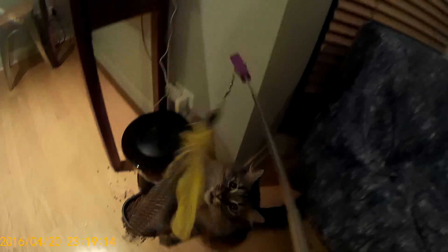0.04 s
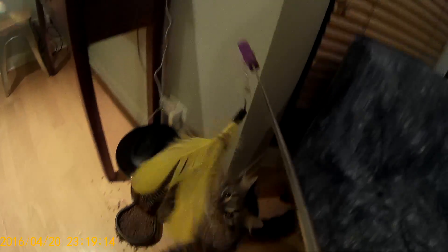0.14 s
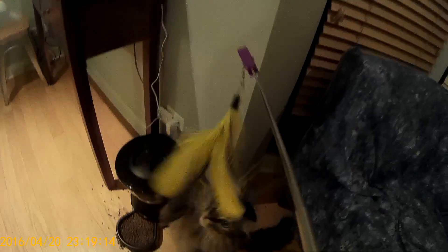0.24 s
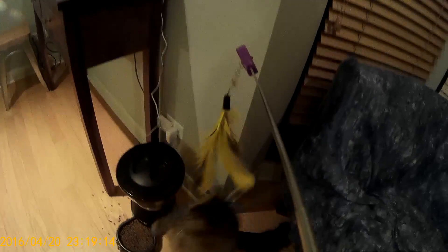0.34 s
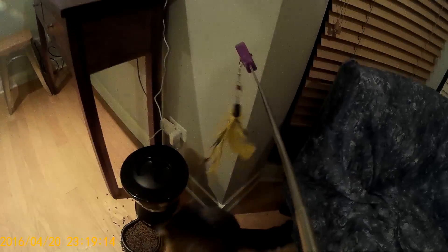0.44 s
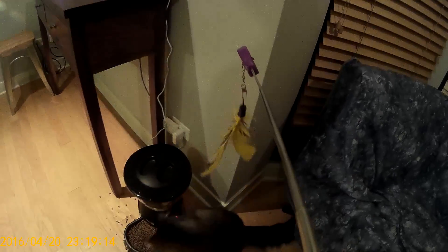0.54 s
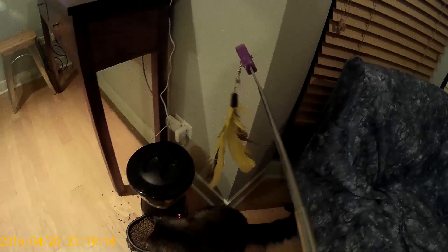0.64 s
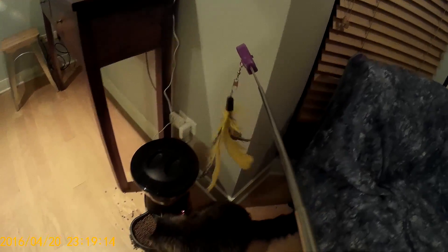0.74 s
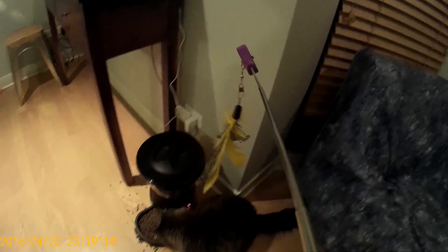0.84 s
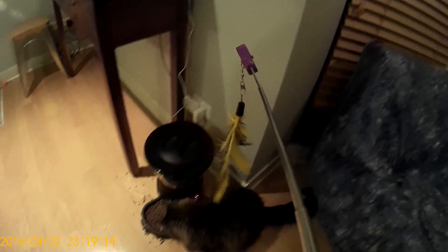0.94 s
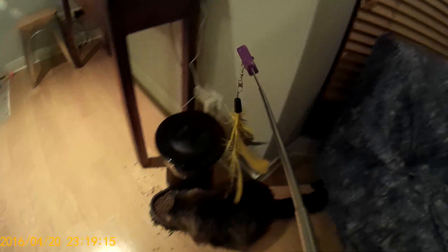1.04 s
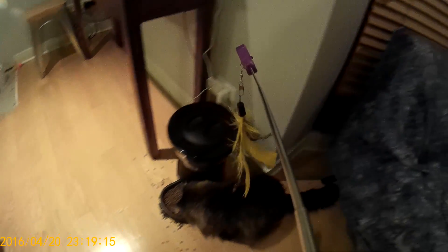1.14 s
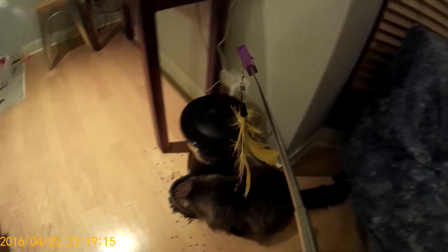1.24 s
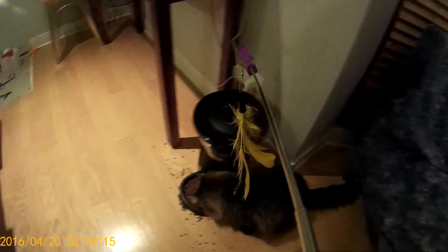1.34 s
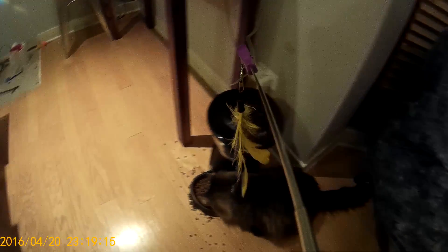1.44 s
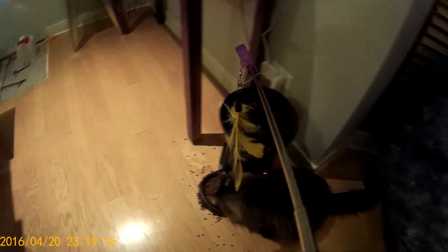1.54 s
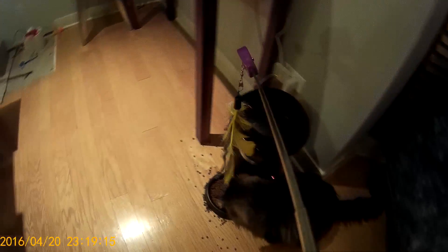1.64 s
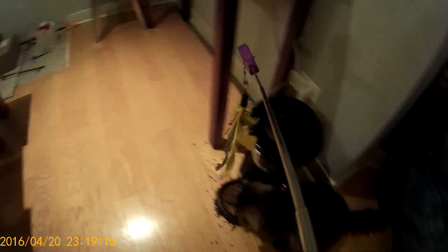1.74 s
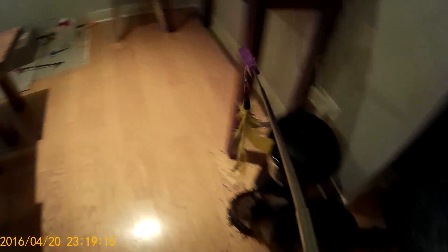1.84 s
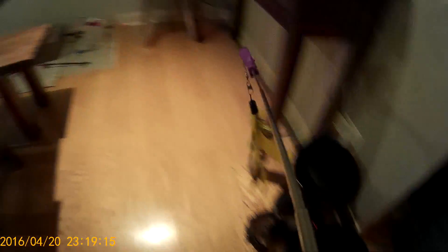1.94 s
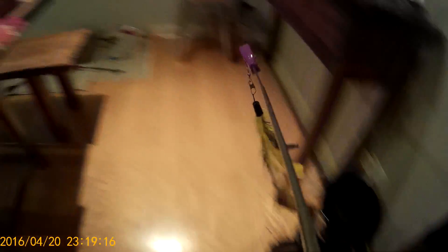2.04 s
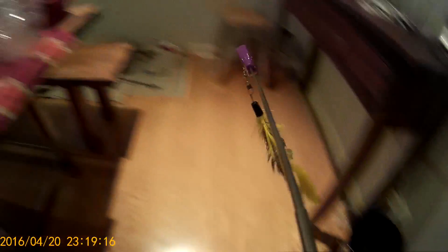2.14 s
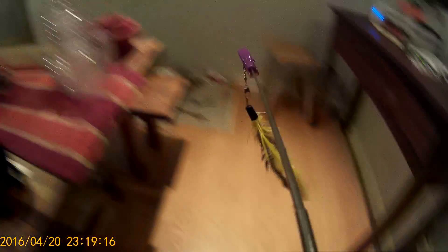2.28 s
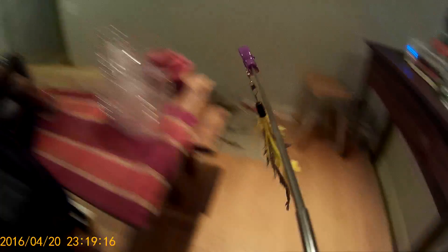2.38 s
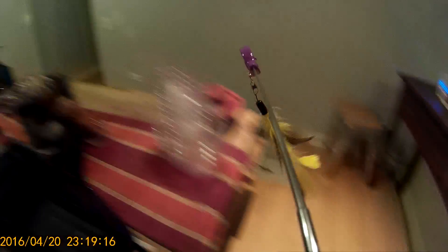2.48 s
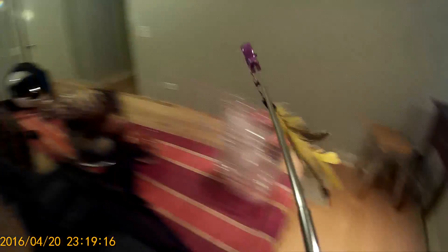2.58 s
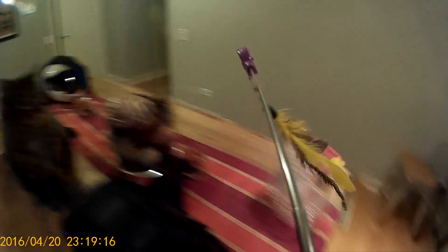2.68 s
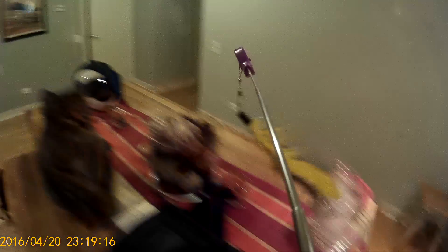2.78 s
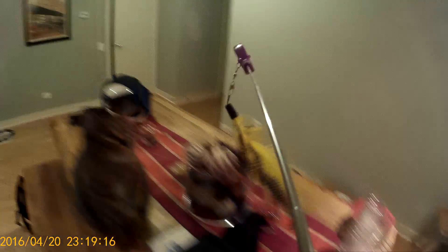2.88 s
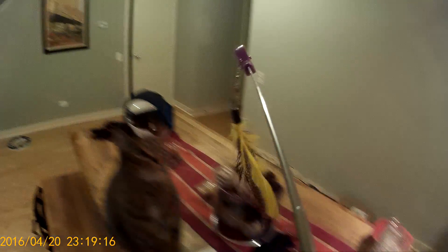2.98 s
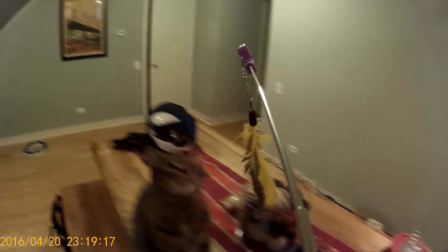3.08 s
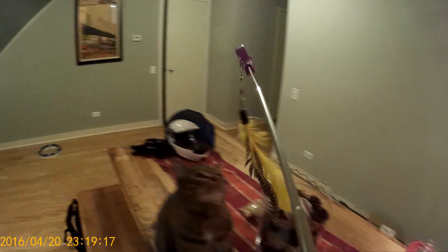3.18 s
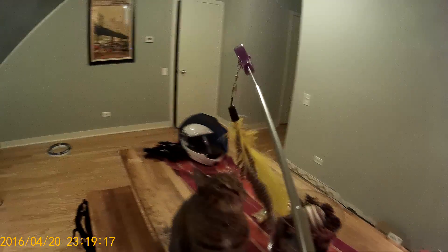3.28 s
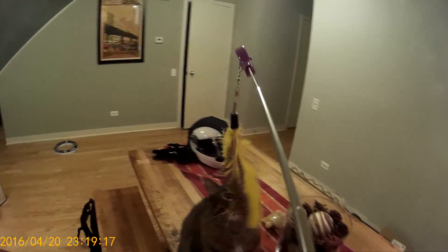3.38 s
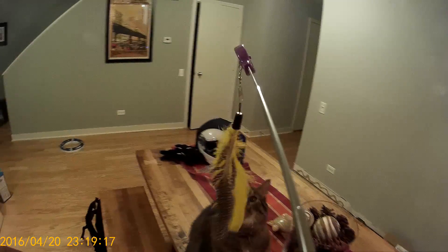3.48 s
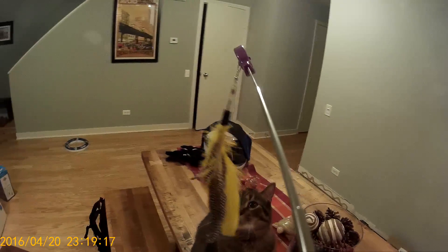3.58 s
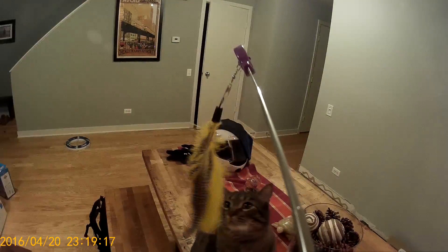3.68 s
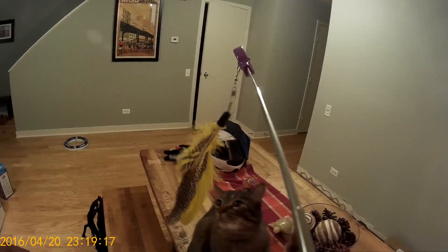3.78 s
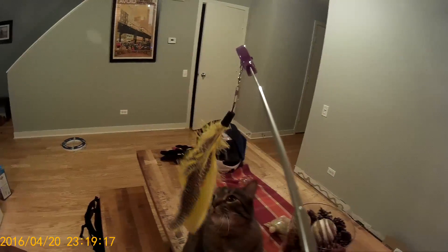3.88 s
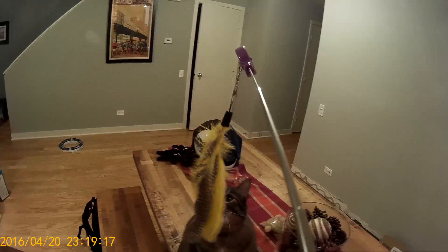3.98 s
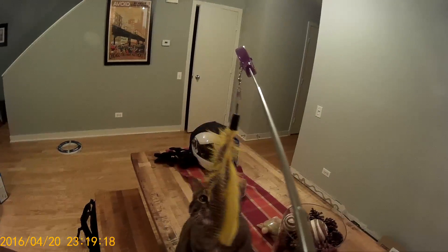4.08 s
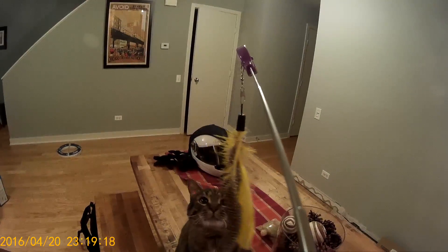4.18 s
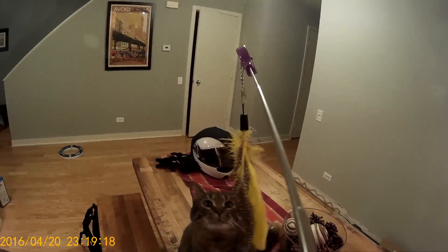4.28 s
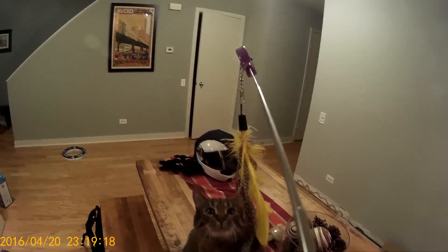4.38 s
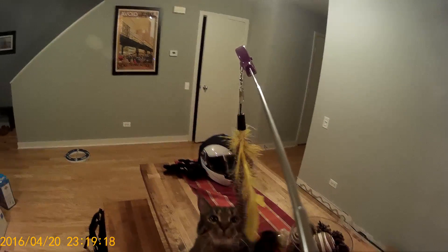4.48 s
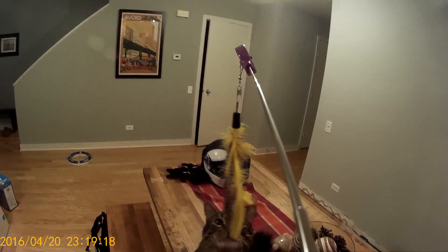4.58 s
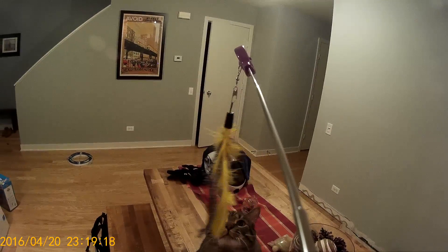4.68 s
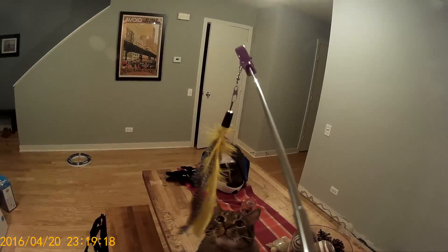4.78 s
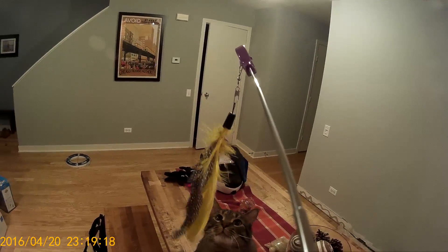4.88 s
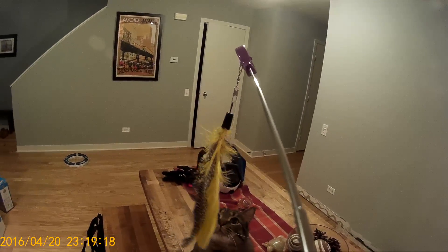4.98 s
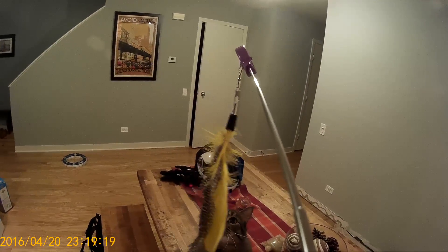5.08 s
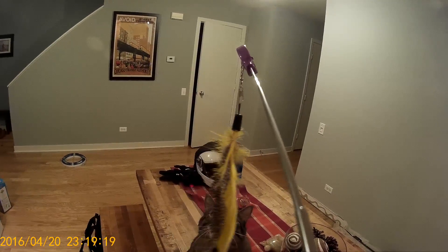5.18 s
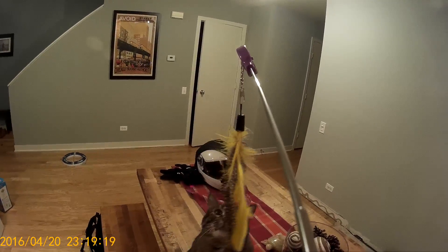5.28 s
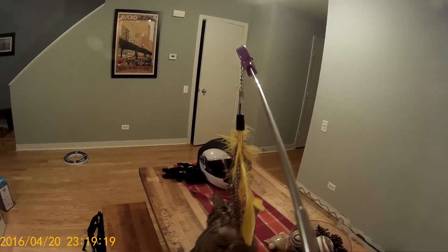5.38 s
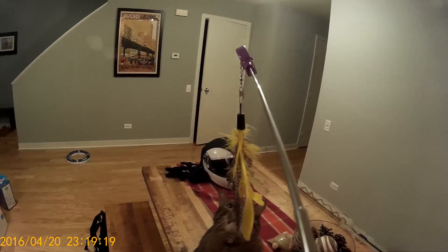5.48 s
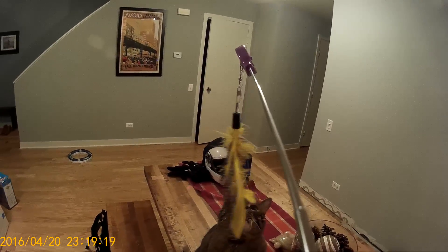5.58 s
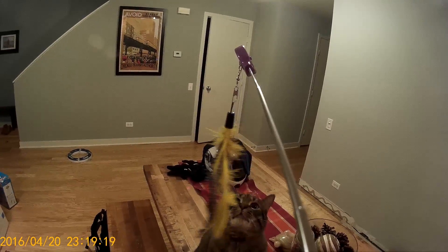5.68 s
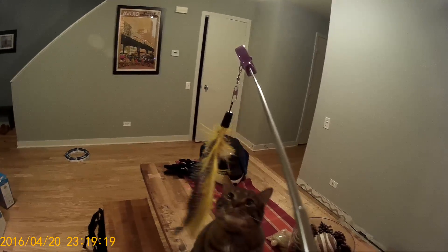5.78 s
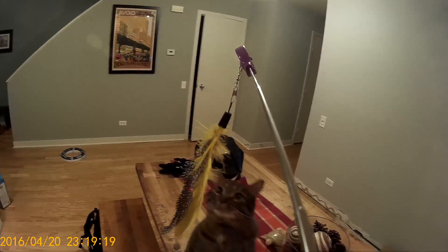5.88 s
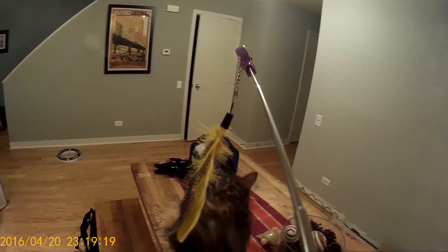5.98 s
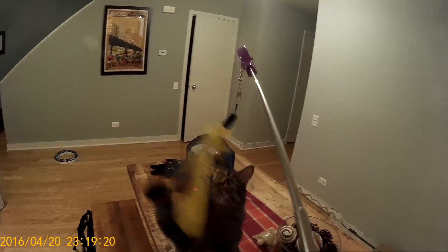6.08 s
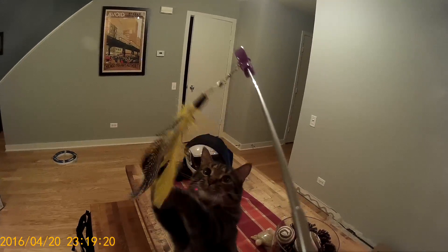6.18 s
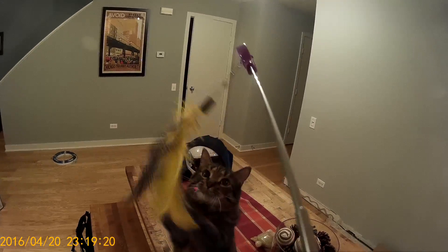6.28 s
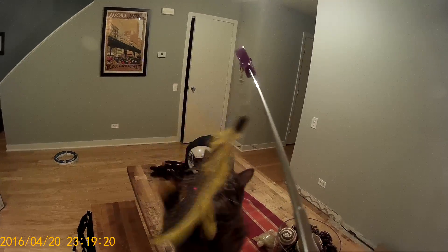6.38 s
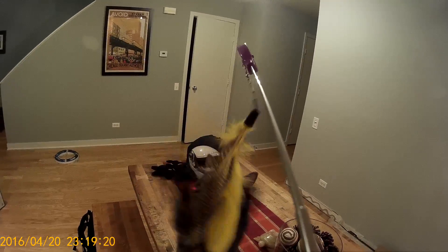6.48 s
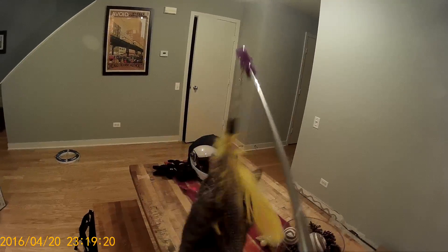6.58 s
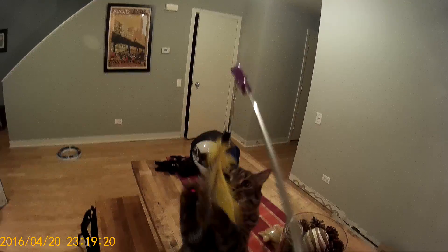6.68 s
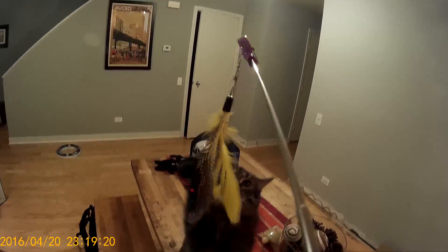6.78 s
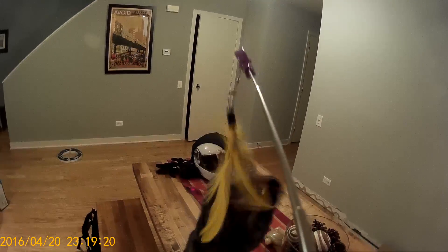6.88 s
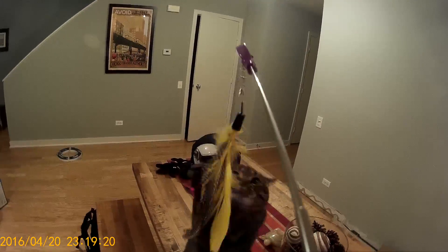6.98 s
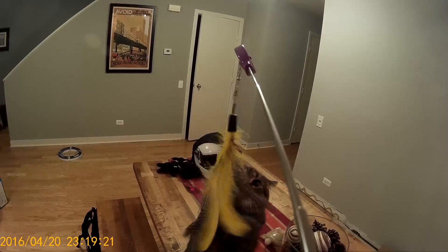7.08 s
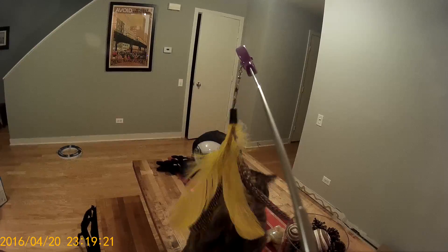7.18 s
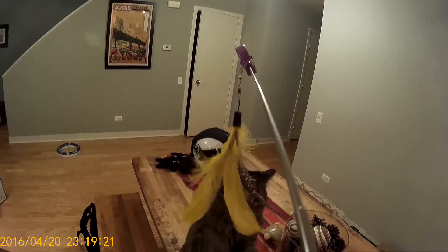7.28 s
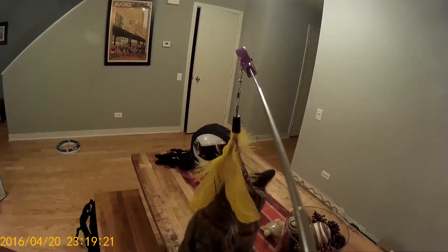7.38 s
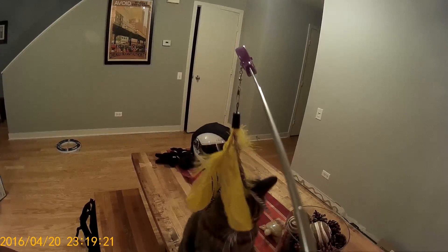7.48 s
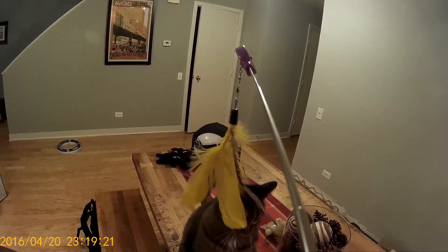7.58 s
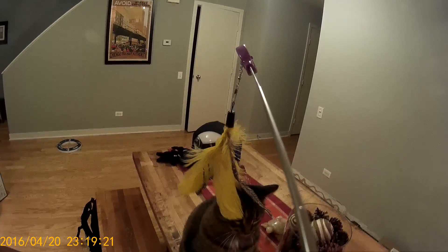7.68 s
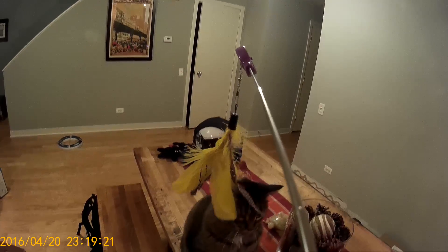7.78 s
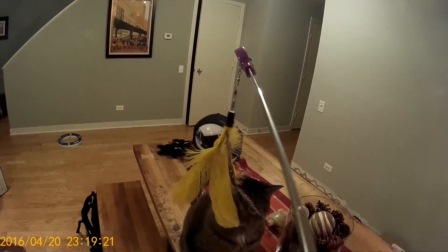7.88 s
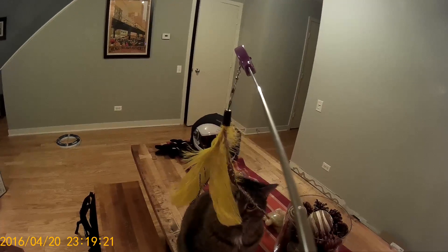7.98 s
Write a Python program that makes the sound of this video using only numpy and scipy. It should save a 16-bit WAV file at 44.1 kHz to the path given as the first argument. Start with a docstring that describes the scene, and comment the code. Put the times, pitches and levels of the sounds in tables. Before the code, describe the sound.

Close knocks and scuffs ring through a thin wand as a cat bats a feather toy, a long quiet lull, then sharper raps and a deep thump.

```python
"""A quiet room where a cat bats a feather toy hung on a line from a thin wand. A small camera clamped to the wand
hears it as a solid. Tugs and taps ring the rod's bending modes, treble first and bass late.
Tiny slips of the line make the scrape, and jerks make the whole wand sway at a low pitch.
The hand adds an unsteady rumble; shaped noise gives the room tone and microphone hiss."""
import sys
import numpy as np
from scipy import signal
from scipy.fft import rfft, irfft, next_fast_len
from scipy.io import wavfile
from scipy.ndimage import uniform_filter1d

SR = 44100
rng = np.random.default_rng(int(sys.argv[2]) if len(sys.argv) > 2 else 0)


def pcm_store(signal):
    """Save signal as 16-bit PCM."""
    levels = np.round(np.clip(np.atleast_2d(signal), -1, 1) * 32767)
    wavfile.write(sys.argv[1], SR, levels.astype(np.int16).T)


def makeup_ratio(level_db):
    """Linear amplitude ratio for a level in decibels (20 dB per factor of ten)."""
    decades = np.asarray(level_db, float) / 20
    return 10 ** decades


N = 354563
T = np.arange(N) / SR


def level(x, db):
    """Scale to an rms level in dB."""
    return x * makeup_ratio(db) / np.sqrt(np.mean(x ** 2))


def walk(rate):
    """Slow random drift: values held 1 / rate seconds, smoothed twice, with an rms of 1."""
    hold = int(SR / rate)
    steps = rng.standard_normal(N // 100)
    held = steps[np.arange(N) // hold]
    return level(uniform_filter1d(uniform_filter1d(held, hold), hold), 0)


def burst(s, db, rise_s, hold_s, t60):
    """Loudness curve of one event: a quick rise, a hold, then a fall by 60 dB in t60 seconds."""
    after = np.maximum(T - s, 0)
    fall_db = 60 * np.maximum(after - hold_s, 0) / t60
    return makeup_ratio(db - fall_db) * (1 - np.exp(-after / rise_s))


def ring(force, hz, t60):
    """One mode of the rod: pushed by a force, it rings at its own pitch and dies by 60 dB in t60 seconds."""
    pole = np.exp(2j * np.pi * hz / SR - np.log(1000) / (t60 * SR))
    return signal.lfilter([1], [1, -pole], force).imag


ROOM_DB = -65  # rms of the part above 100 Hz
# Colour of the steady background: f/Hz, relative level/dB (per Hz)
ROOM_COLOUR = [(12, -34), (20, -4), (53, -1), (131, -7), (312, -12), (349, -14), (401, -13), (449, -15),
               (1420, -26), (14100, -29), (16200, -35.5)]


def room():
    """White noise coloured into steady room tone in the bass and even microphone hiss above."""
    hz = np.maximum(np.arange(N // 2 + 1) * SR / N, 1)
    points_hz, points_db = np.transpose(ROOM_COLOUR)
    colour = makeup_ratio(np.interp(np.log(hz), np.log(points_hz), points_db))
    coloured = rfft(rng.standard_normal(N)) * colour
    above_bass = irfft(coloured * (hz > 100), N)
    return irfft(coloured, N) * makeup_ratio(ROOM_DB) / np.sqrt(np.mean(above_bass ** 2))


TREMBLE_DB = 3.0  # rms unsteadiness of the rumble and of the sway it stirs up
# How briskly the hand moves the wand: t/s, level/dB (rms of its rumble before the tremble)
HAND_MOTION = [(0, -47.5), (.2, -66), (.45, -71.5), (1.55, -80), (1.8, -64.5), (2.25, -65.5), (2.4, -68.5),
               (2.7, -63), (3.15, -63), (3.45, -77), (6.1, -80), (6.36, -61), (6.63, -62.5), (7.1, -70),
               (7.4, -80), (8.04, -85)]


def hand(db=0, tremble_db=0):
    """Strength of the hand's motion over time, with an optional unsteady tremble."""
    return makeup_ratio(np.interp(T, *np.transpose(HAND_MOTION)) + db + tremble_db * walk(18))


def hand_rumble():
    """The hand shakes the wand slowly: a deep tone that wavers around 38 Hz."""
    wavering_hz = 38 * (1 + 0.09 * walk(9))
    rumble = np.sqrt(2) * np.sin(2 * np.pi * np.cumsum(wavering_hz) / SR)
    return hand(0, TREMBLE_DB) * rumble


SWAY_HZ, HAND_SWAY_DB = 70.6, -3  # lowest mode before its waver; sway stirred by the hand, against its rumble
SWAY_RISE_S, SWAY_T60_S = .012, 0.121
# Jerks that shake the whole wand, each at its own low pitch, from about 40 to 98 Hz: # t/s, level/dB (rms if
# fully risen), hold t/s, f/Hz (as the grip allows, before the waver)
JERKS = [(0.001, -40.5, 0.034, 98), (.001, -54, .03, 40), (0.097, -38, 0.04, 68), (.1, -55, .04, 40),
         (0.176, -42, 0.043, 72), (0.253, -53, 0.036, 68), (0.432, -59, 0.022, 80),
         (.6, -60.5, 0.065, 84.6), (1.804, -61, 0.098, 54.9), (1.901, -59, .09, 67.6),
         (1.952, -58.5, 0.039, 40.2), (2.069, -60, 0.034, 70.5), (2.199, -57.5, 0.058, 39.9),
         (2.45, -62, 0.13, 71), (2.667, -48.5, 0.017, 52), (2.749, -57, 0.044, 61), (2.808, -59, 0.076, 79),
         (3.069, -55, .07, 70.4), (3.098, -57, 0.043, 40), (3.185, -56, 0.045, 66), (3.381, -64.5, .03, 71),
         (3.909, -60, .03, 75), (4.0, -62, .04, 75), (5.213, -58.5, 0.066, 71.6), (6.223, -55, 0.036, 75),
         (6.318, -51.5, 0.047, 72), (6.441, -59, 0.055, 69.5), (6.578, -49, 0.05, 74),
         (6.607, -52, .05, 42), (6.695, -53, 0.035, 85), (6.752, -42, 0.073, 64.6), (6.919, -35, .075, 70),
         (7.101, -64.5, 0.1, 69.8)]


def sway():
    """The whole wand shakes after jerks and as the hand moves; pitches waver as the grip changes."""
    clock = np.cumsum(1 + 0.06 * walk(12)) / SR  # time running unevenly bends every pitch

    def shake(hz, turn=0):
        return np.sqrt(2) * np.sin(2 * np.pi * (hz * clock + turn))

    jerks = np.zeros(N)
    for s, db, hold_s, hz in JERKS:
        start_turn = -hz * clock[int(s * SR)]  # each shake starts from rest
        jerks += burst(s, db, SWAY_RISE_S, hold_s, SWAY_T60_S) * shake(hz, start_turn)
    return jerks + hand(HAND_SWAY_DB, TREMBLE_DB) * shake(SWAY_HZ)


LEAD = SR // 200  # samples by which the fastest waves may run ahead


def travel(x, contact_s, spread=0.029, first_hz=1400):
    """A padded contact dulls the push; higher bending waves run faster: delay = spread / sqrt(Hz)."""
    size = next_fast_len(2 * len(x))
    hz = np.arange(size // 2 + 1) * SR / size
    # the second term sets the delay to zero at first_hz
    turn = 2 * np.pi * spread * (2 * np.sqrt(hz) - hz / np.sqrt(first_hz))
    return irfft(rfft(x, size) * np.exp(-1j * turn - (hz * contact_s) ** 2), size)[:len(x)]


PAIR_HZ, LEAN_WIDTH_HZ = 1388, 120  # a lean weighs the modes above this pitch against those below
# Bending modes of the rod, in three families from low to high:
# f/Hz, relative level/dB when struck, t60/s before damping, signed strength at the clamp,
# relative level/dB when rubbed
BODY_MODES = [(113, -7.5, 0.059, -0.7, 0.5), (214, -1, 0.097, 0.93, -4), (340, -0.5, 0.027, -1.108, -3.5),
              (424.5, -1.5, 0.1, 0.95, -8), (520.7, -8.5, 0.032, -1.024, -7.5)]
KNOCK_MODES = [(788, -14, .037, -1.2, -3), (964, -8, 0.046, 0.79, 0), (1063.6, -15, 0.037, -1.1, -4),
               (1304, 1, 0.063, 0.88, -5), (1507, -2, .047, -1, -1), (1682, -8, 0.036, -0.84, -7),
               (1933, -9, .036, 0.99, -7.5), (2148, -13, 0.045, 1, -12.5), (2496, -11, .035, 0.98, -17)]
TICK_MODES = [(3100, -4.5, .03, 0.95, -5), (3348, -5, 0.044, -1, -8), (3920, 2, .03, 0.96, -1.5),
              (4330, -5.5, 0.027, -1.4, -7.5), (4550, 2.5, 0.012, 0.97, -6.5), (4846, -6, .015, -1.5, -7)]


def struck(modes, lean_db, ring_share, contact_s, scatter_db=3.0):
    """One family of modes rings after a tap and travels to the clamp; the peak is scaled to 1."""
    tap = np.eye(1, SR // 4, LEAD)[0]  # a single push at sample LEAD
    chance = rng.standard_normal(len(modes))
    out = 0
    for (hz, db, t60, sense, _), luck in zip(modes, chance):
        side = np.tanh((hz - PAIR_HZ) / LEAN_WIDTH_HZ) / 2
        mode_db = db + side * lean_db + scatter_db * luck
        out = out + sense * makeup_ratio(mode_db) * ring(tap, hz, ring_share * t60)
    out = travel(out, contact_s)
    return out / np.abs(out).max()


# harder blows pull the line taut and it damps the ring: share of the free ring time
SOFT_DB, SOFT_RING, RING_LOSS_PER_DB = -35.5, 1.11, 0.0316
# a blow and its quick rebound keep the contact closed, which damps both
REBOUND_S, REBOUND_RING = .01, 0.61
# Blows on the rod: t/s, knock peak level/dB, body level/dB and tick level/dB (both against the knock),
# lean/dB of the knock toward its upper modes
ROD_BLOWS = [(.002, -41.5, 9, -31, 9), (.1, -40.5, 13.5, -30.5, 10), (0.16, -16, -9, -17, 3),
             (0.1662, -23, -12, -34, 5), (0.2427, -32, -6, -19.5, 0), (2.489, -43.5, -6.5, -29.5, -5.5),
             (3.048, -33.5, -4.5, -28.5, -1.5), (3.8836, -40.5, -4, -32.5, -4.5),
             (5.2065, -39, -6, -35.5, -8.5), (6.3018, -29, -5.5, -19.5, 2.7),
             (6.7518, -23, -5.5, -13.5, -6), (6.7566, -22, -19, -29.5, 10), (6.7938, -24.5, -11, -20, 1),
             (6.994, -21.5, -9.5, -25.5, 0.6), (7.021, -38, -13.5, -10.5, 17), (7.685, -53, -12, -30, -10)]


def blows():
    """Each blow's padded contact rings the knock and body modes, its hard edge the ticks."""
    out = np.zeros(N + SR)
    for s, db, body_db, tick_db, lean_db in ROD_BLOWS:
        share = SOFT_RING - RING_LOSS_PER_DB * max(db - SOFT_DB, 0)
        close_blows = sum(abs(s - other[0]) < REBOUND_S for other in ROD_BLOWS)  # counts itself
        if close_blows > 1:
            share = REBOUND_RING
        knock = struck(KNOCK_MODES, lean_db, share, contact_s=0.00048)
        body = struck(BODY_MODES, 0, share, contact_s=.00044)
        tick = struck(TICK_MODES, 0, share, contact_s=.0001)
        blow = knock + makeup_ratio(body_db) * body + makeup_ratio(tick_db) * tick
        out[int(s * SR):][:len(blow)] += makeup_ratio(db) * blow
    return out[LEAD:N + LEAD]


# Sudden drags of the line: t/s, knock level/dB, body level/dB and tick level/dB (both against the knock), t60/s
LINE_DRAGS = [(.004, -48.5, 1, -35, 0.047), (0.019, -61, 14, -35, 0.17), (.04, -66, 13, -35, 0.11),
              (0.107, -47.5, 17.5, -35, 0.057), (.128, -60, 12.5, -37.5, 0.18),
              (.178, -56, 6.5, -29.5, .25), (.255, -66, 5, -30, 0.15), (2.684, -68, 20, -32.5, 0.063),
              (2.719, -55, 1, -33, 0.046), (3.138, -57, 5, -25, 0.12), (5.23, -74, 15, -28, 0.39),
              (6.163, -58, -2, -32, 0.05), (6.407, -55, 6, -30, .05), (6.441, -60, -9, -30, .05),
              (6.588, -54, 12, -32, 0.085), (6.619, -57, 11.5, -30, 0.09), (6.675, -71.5, 16, -31, .2),
              (6.769, -50, 4.5, -30, 0.097), (6.83, -57.5, -5, -30, 0.31), (6.896, -65.5, 27, -30, 0.21),
              (6.923, -39.5, 9.5, -23, 0.044), (6.935, -51.5, 7, -26, 0.18), (6.95, -48, 4, -26, .05),
              (7.026, -50.5, -10, -12, 0.028), (7.04, -72.5, 15.5, -30, 0.33), (7.091, -64, -2, -30, 0.034)]


def scuffs(column, rise_s=0.0021):
    """Strength of the sudden drags for one family of modes: each sets in within a few ms and dies away."""
    total = 0
    for row in LINE_DRAGS:
        db = row[1] + (row[column] if column > 1 else 0)
        total = total + burst(row[0], db, rise_s, 0, row[-1])
    return total


def rubbed(modes, drag, grit_db, damp):
    """Dense tiny slips, as strong as the drag, keep the modes sounding; the contact shortens their ring."""
    slips = rng.standard_normal(N) * makeup_ratio(grit_db * walk(120))
    steady, heard = 0, 0
    for hz, _, t60, sense, db in modes:
        even, dragged = sense * makeup_ratio(db) * ring([slips, slips * drag], hz, damp * t60)
        steady, heard = steady + even, heard + dragged
    return heard / steady.std()  # a steady drag of 1 would give an rms of 1


# after a blow the line goes on rubbing the rod: levels after a blow of SOFT_DB,
# growth per dB of blow, time to die by 60 dB
AFTER_KNOCK_DB, AFTER_BODY_DB, AFTER_GROWTH, AFTER_T60_S = -78, -61, .4, .45
HAND_BODY_DB, HAND_KNOCK_DB = -4, -14  # rubbing stirred by the hand, against its rumble


def scrape():
    """The line rubs the rod as the hand moves, after each blow and in sudden scuffs."""
    after = 0
    for s, db, *_ in ROD_BLOWS:
        after = after + burst(s, AFTER_GROWTH * (db - SOFT_DB), 0.0081, 0, AFTER_T60_S)
    knock_drag = hand(HAND_KNOCK_DB) + makeup_ratio(AFTER_KNOCK_DB) * after + scuffs(column=1)
    body_drag = hand(HAND_BODY_DB) + makeup_ratio(AFTER_BODY_DB) * after + scuffs(column=2)
    knock = rubbed(KNOCK_MODES, knock_drag, grit_db=3.0, damp=0.56)
    body = rubbed(BODY_MODES, body_drag, grit_db=4.5, damp=0.52)
    tick = rubbed(TICK_MODES, scuffs(column=3), grit_db=5.0, damp=.8)
    return knock + body + tick


def scene():
    """All the sounds add up at the single microphone."""
    mix = room() + hand_rumble() + sway() + blows() + scrape()
    return mix[None]  # one channel


def top_cut(x):
    """Nothing passes above the cut-off."""
    return signal.sosfilt(signal.butter(12, 16390, fs=SR, output="sos"), x)


def record(dry):
    """The finished mix goes to the camera's storage."""
    return top_cut(dry)


dry = scene()
out = record(dry)
pcm_store(out)
```